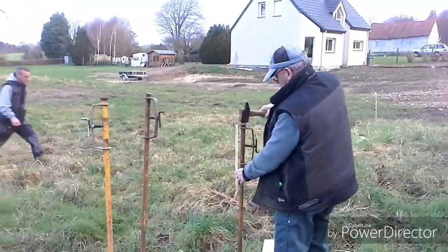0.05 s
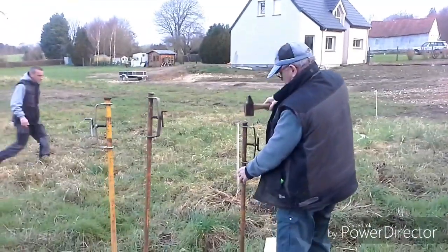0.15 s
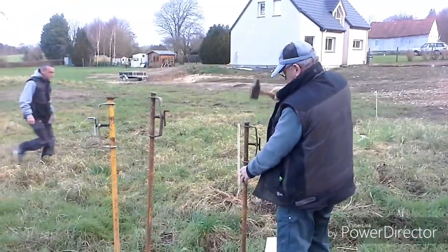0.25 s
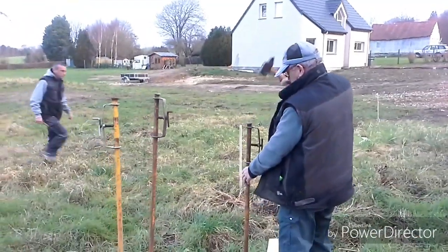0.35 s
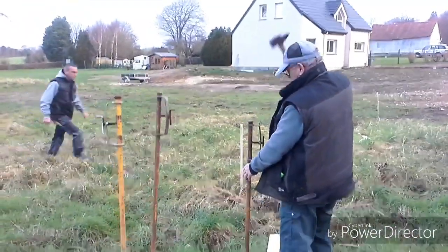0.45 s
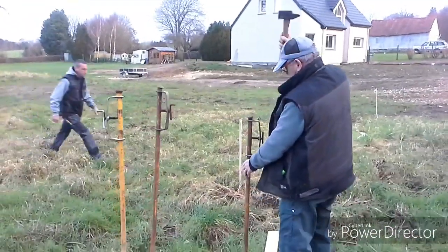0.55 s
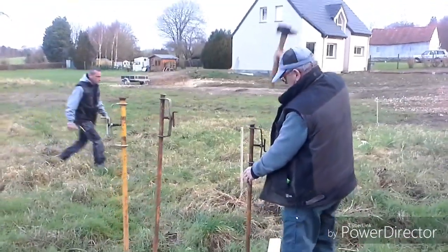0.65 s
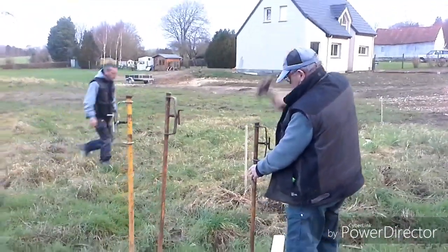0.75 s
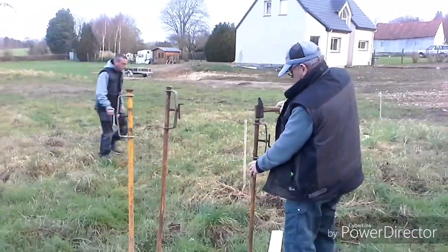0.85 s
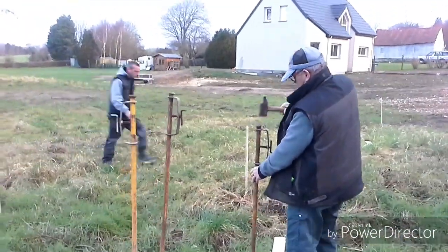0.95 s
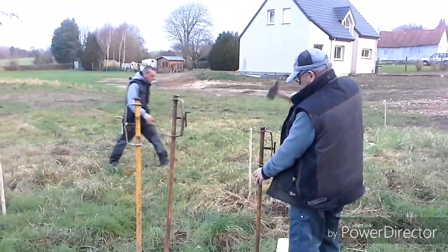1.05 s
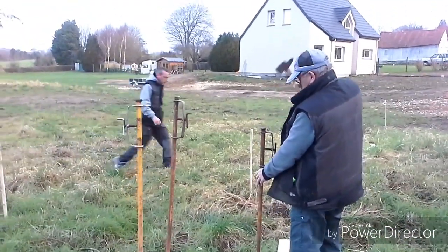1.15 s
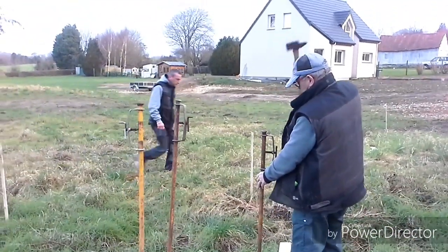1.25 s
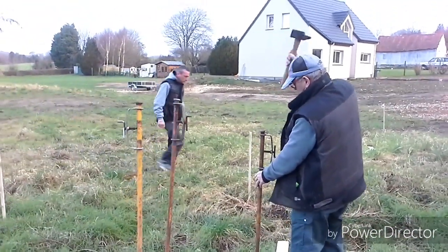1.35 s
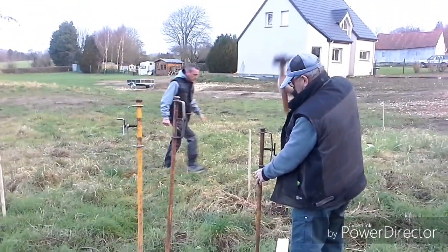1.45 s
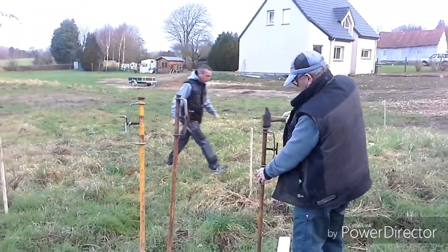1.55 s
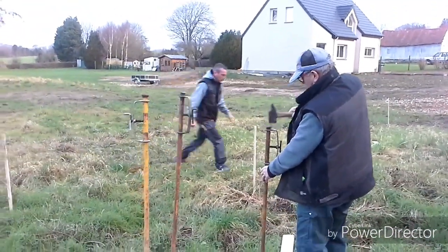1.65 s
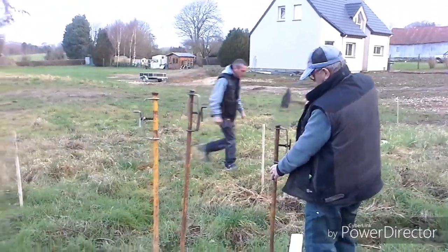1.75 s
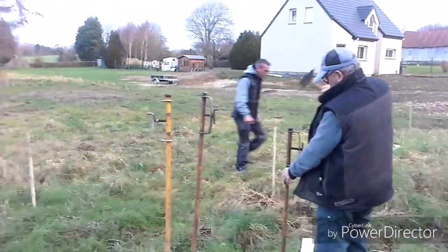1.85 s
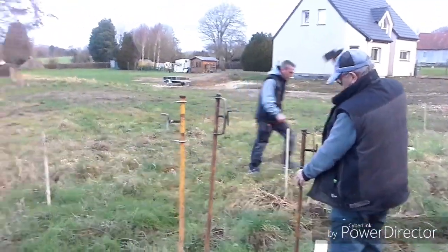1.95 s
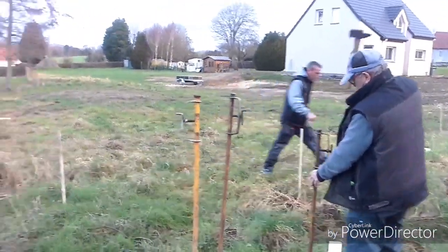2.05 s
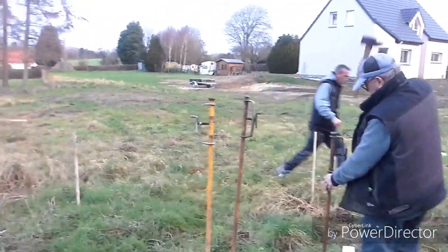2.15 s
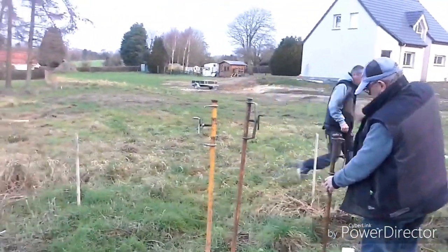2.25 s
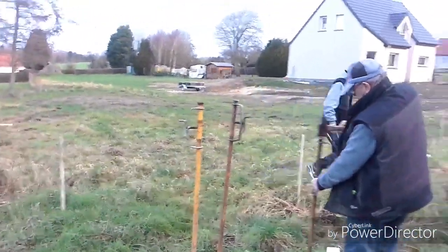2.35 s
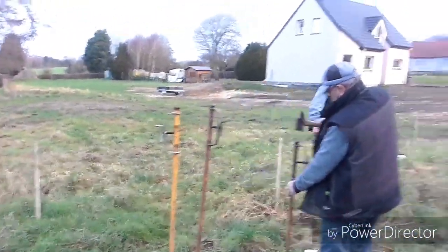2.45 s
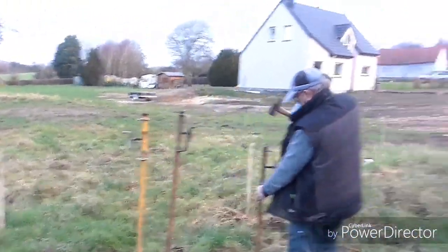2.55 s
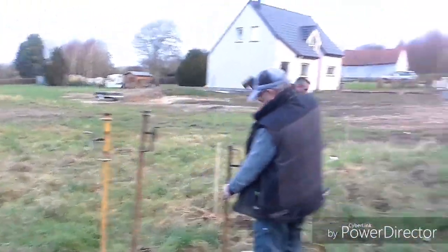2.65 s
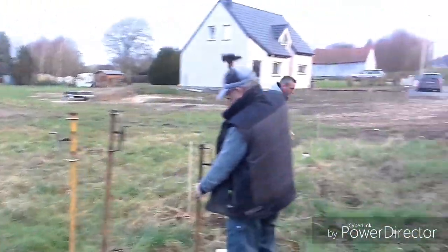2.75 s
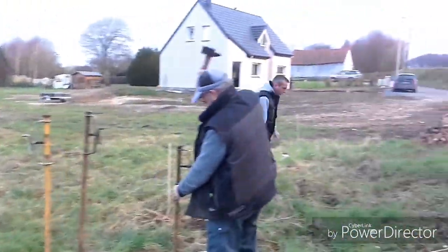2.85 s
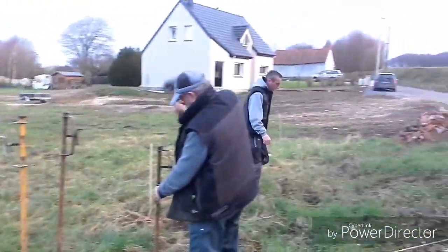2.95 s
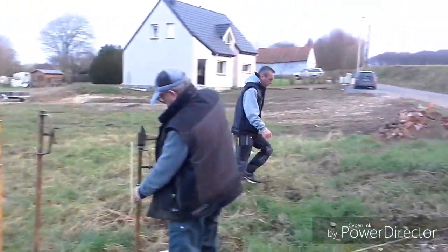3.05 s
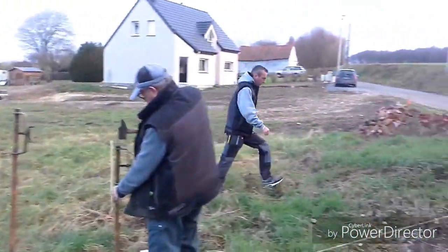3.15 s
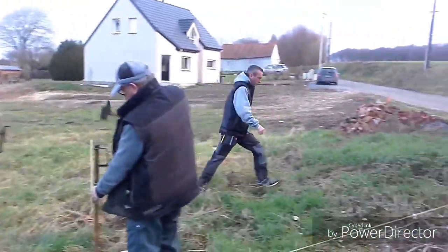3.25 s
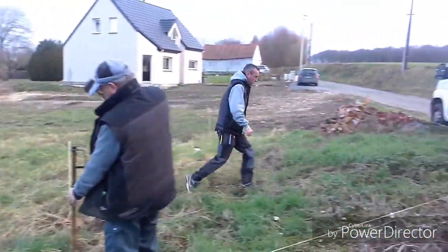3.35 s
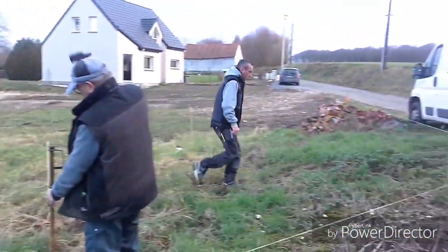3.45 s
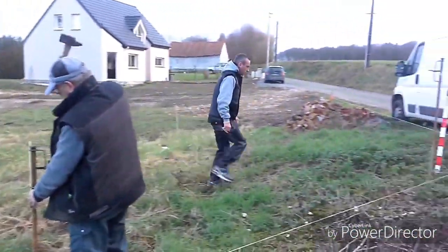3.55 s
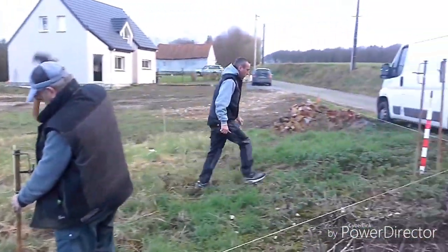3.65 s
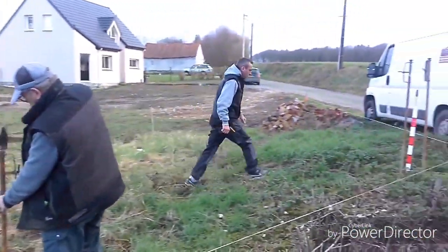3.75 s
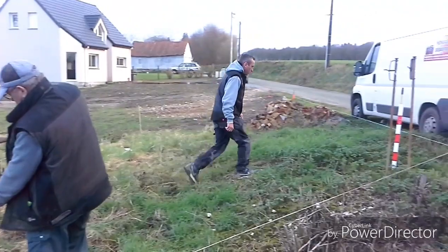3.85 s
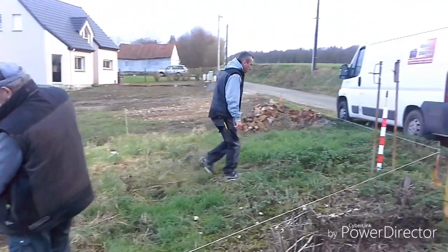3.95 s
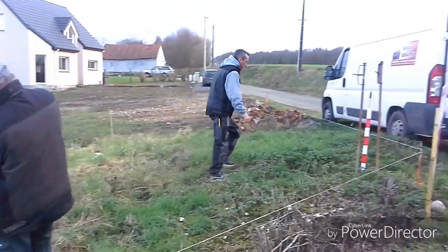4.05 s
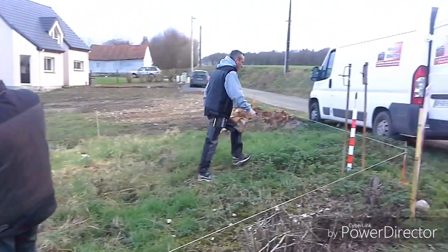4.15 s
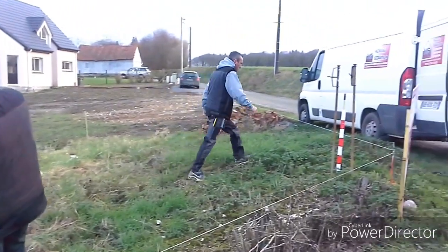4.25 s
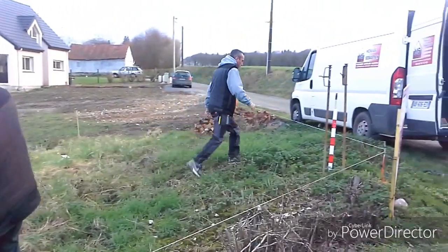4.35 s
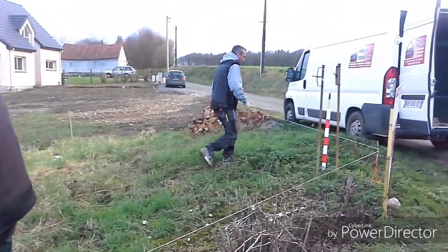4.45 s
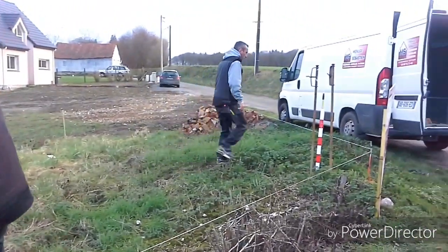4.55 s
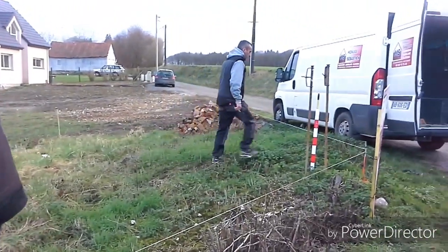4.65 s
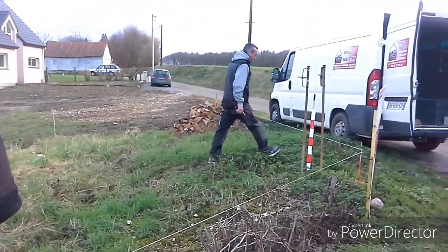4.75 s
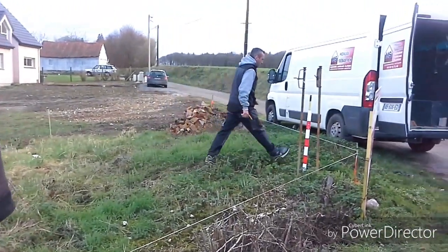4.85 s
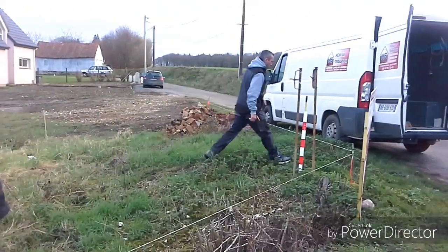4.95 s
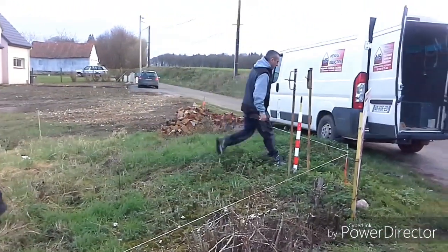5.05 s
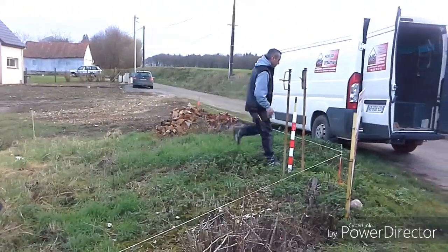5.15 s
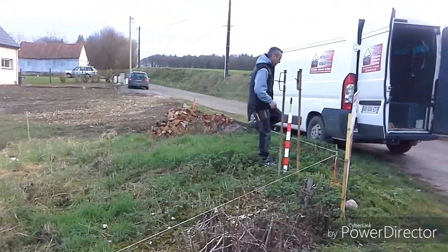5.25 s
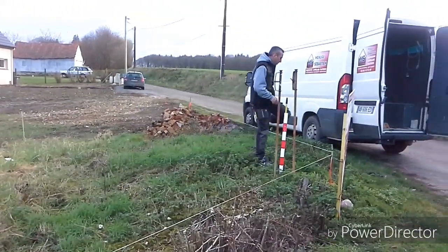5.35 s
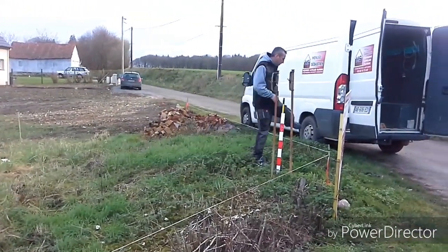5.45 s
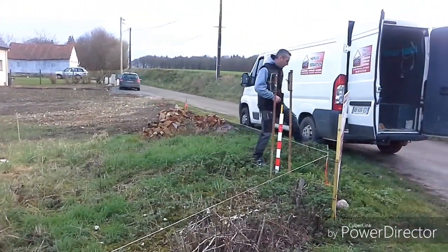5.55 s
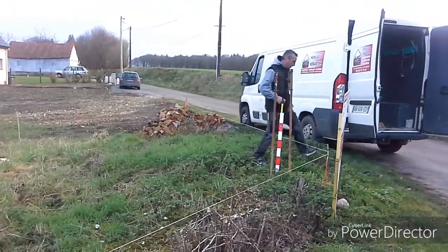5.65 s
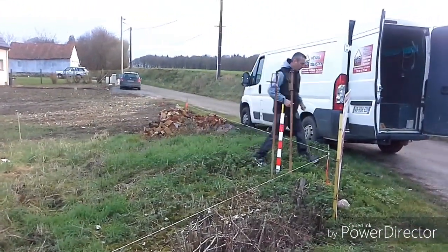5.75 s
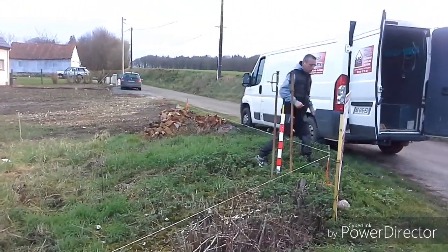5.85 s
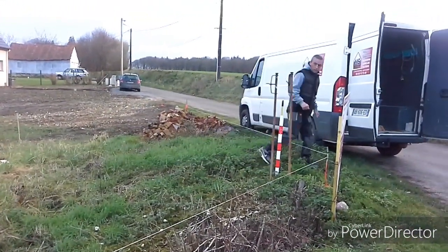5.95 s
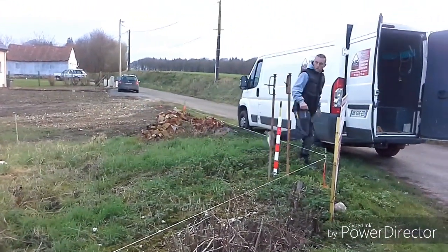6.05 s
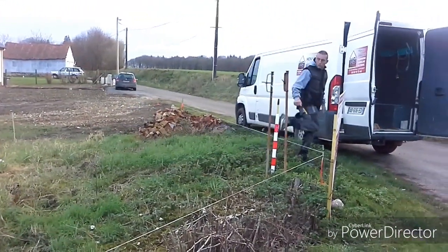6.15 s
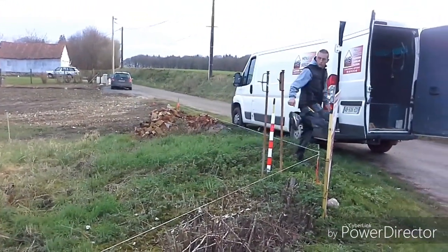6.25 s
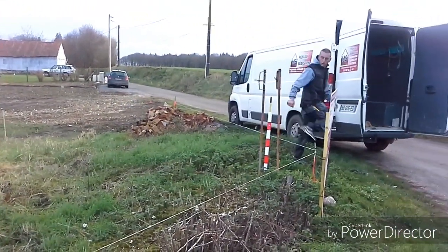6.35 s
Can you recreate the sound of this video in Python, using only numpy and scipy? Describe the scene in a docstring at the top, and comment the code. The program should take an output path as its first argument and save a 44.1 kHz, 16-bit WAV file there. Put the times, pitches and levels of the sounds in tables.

```python
"""Hammering a steel stake in a field

Open countryside, one camera microphone a few metres from the stake, overloading on each of eight blows.
The hand-held steel rings briefly, the hammer rebounds, and houses and a van throw the blow back.
Wind rumbles and pops on the capsule; late on, a far engine whine sinks in pitch over the hush."""
import sys
import numpy as np
from scipy import signal
from scipy.io import wavfile
from scipy.ndimage import uniform_filter1d

SR = 44100
rng = np.random.default_rng(int(sys.argv[2]) if len(sys.argv) > 2 else 0)


def int16_out(signal):
    """Quantize to a 16-bit WAV file."""
    q = np.round(np.clip(np.atleast_2d(signal).T, -1, 1) * 32767)
    wavfile.write(sys.argv[1], SR, q.astype(np.int16))


N = 282681
T = np.arange(N) / SR


def undb(db):
    return 10 ** (np.asarray(db) / 20)


def unit_rms(x):
    return x / np.sqrt(np.mean(x ** 2))


def band(x, lo_hz, hi_hz, order=2):
    return signal.sosfilt(signal.butter(order, [lo_hz, hi_hz], "bandpass", fs=SR, output="sos"), x)


def fade(t, t60):
    return np.exp(-np.log(1000) * t / t60)


def add(out, x, start_s):
    i = int(start_s * SR)
    out[i:i + len(x)] += x[:N - i]


def wander(rate_hz):
    """Random levels held for 1 / rate_hz seconds and smoothed twice; spread near 1."""
    hold = int(SR / rate_hz)
    steps = np.repeat(rng.standard_normal(N // hold + 1), hold)
    return 1.3 * uniform_filter1d(uniform_filter1d(steps, hold), hold)[:N]


# hush at the microphone, with the lingering echo of some blows: (time [s], level [dB], treble lift [dB])
HUSH_LEVELS = [(0.0, -56, 8), (0.4, -48, 4), (0.9, -52, 6), (1.3, -54.5, 8), (2.2, -53.5, 5.5),
               (2.521, -47.5, 3.5), (2.8, -52.5, 3), (3.6, -53, 5.5), (4.36, -47.5, 6), (4.52, -52, 6.5),
               (4.62, -54, 1), (4.75, -52, 6.5), (5.25, -49.5, 4), (5.55, -55.5, 2.5), (5.75, -58, 3.5),
               (6.0, -56, 6), (6.41, -52, 5)]
# its spectrum: (frequency [Hz], relative density [dB])
HUSH_SPECTRUM = [(200, -12), (320, 0), (550, -4), (800, -2), (1150, -7.5), (1500, -16), (2200, -23),
                 (4000, -26.5), (8000, -28), (14500, -27.5)]


def hush():
    """Background hush and hiss in half-octave bands, swelling with the lingering echo after some blows."""
    times, level_db, treble_db = np.transpose(HUSH_LEVELS)
    level_db, treble_db = np.interp(T, times, level_db), np.interp(T, times, treble_db)
    spectrum_hz, density_db = np.transpose(HUSH_SPECTRUM)
    out = 0
    for hz in 240 * 2 ** np.arange(0, 6.1, .5):
        band_db = np.interp(np.log(hz), np.log(spectrum_hz), density_db) + 10 * np.log10(hz / 1000)
        lift_db = treble_db * np.clip(np.log2(hz / 1000), 0, 1)
        flicker_db = wander(20)
        noise = unit_rms(band(rng.standard_normal(N), hz / 2 ** .25, hz * 2 ** .25))
        out = out + undb(band_db + flicker_db + lift_db) * noise
    return out * undb(level_db - 0.5)


# gusts reaching the microphone: (start [s], length [s], rumble level [dB])
WIND_GUSTS = [(0, 0.11, -53), (.51, 0.18, -45), (1.03, .28, -40), (1.41, 0.15, -50), (1.686, 0.033, -49),
              (1.977, 0.37, -55), (2.36, .35, -43), (3.297, 0.73, -54), (4.335, .15, -53),
              (4.678, 0.17, -52), (5.948, 0.15, -50), (6.22, 0.11, -55)]


def gusts(calm_db=-60, rise_s=.015, fall_s=.03):
    """Gain of the wind rumble: each gust rises quickly, holds and dies away."""
    gain = undb(calm_db)
    for start, length, db in WIND_GUSTS:
        rise = 1 / (1 + np.exp(np.clip((start - T) / rise_s, -50, 50)))
        fall = np.exp(-np.maximum(T - start - length, 0) / fall_s)
        gain = gain + undb(db) * rise * fall
    return gain


# loud wind pops, right on the capsule: (time [s], level [dB], pitch [Hz])
LOUD_POPS = [(0.039, -34, 172), (0.202, -27.5, 245), (0.516, -22, 158.7), (0.564, -16, 225),
             (0.608, -20, 228.5), (0.626, -19, 160), (0.645, -20.5, 208), (0.666, -24.5, 252),
             (0.677, -22, 147), (0.733, -34, 200), (0.99, -29, 210), (1.01, -32, 210), (1.044, -25, 148),
             (1.073, -15, 202), (1.112, -17.5, 198.2), (1.123, -17, 164.4), (1.159, -10, 240),
             (1.179, -21, 200.3), (1.209, -16, 208), (1.245, -20, 249), (1.27, -19, 233),
             (1.28, -22.5, 286.3), (1.302, -20, 260), (1.415, -27, 170), (1.436, -23, 191),
             (1.46, -29.5, 217), (1.506, -26.5, 168.3), (1.538, -33, 173.9), (1.623, -31.5, 199),
             (1.962, -30.5, 179), (1.973, -22, 222), (2.039, -31, 147), (2.109, -24.5, 164.5),
             (2.262, -20, 197), (2.398, -22.5, 221), (2.425, -31, 185), (2.468, -16.5, 405),
             (2.478, -21.5, 350), (2.508, -20, 189.7), (2.543, -25, 157), (2.579, -25, 180),
             (2.611, -13, 320), (2.628, -17, 157), (2.655, -33, 215), (2.671, -27.5, 185),
             (2.693, -32, 218), (2.707, -33, 182), (2.816, -34, 166.5), (3.32, -29, 154.4),
             (3.51, -27, 237), (3.564, -22.5, 202), (3.625, -30, 184), (3.759, -30, 154), (3.939, -30, 239),
             (4.347, -29, 157), (4.426, -29.5, 143), (4.529, -29, 197), (4.619, -32, 171),
             (4.756, -29, 185), (4.903, -34, 198.6), (5.187, -34.5, 364), (5.986, -28, 263.7),
             (6.051, -19.5, 295), (6.186, -32.5, 213.4)]


def wind_pops(gust, small_count=170, over_rumble_db=11, small_centre_hz=185):
    """Eddies knock the membrane for a cycle or two; small knocks fall at random among the loud ones."""
    place, size, pitch = rng.random((small_count, 3)).T
    crowding = np.cumsum(gust ** .4)  # eddies crowd into the gusts
    small_s = np.clip(np.interp(place, crowding / crowding[-1], T), .03, T[-1])
    small_db = 20 * np.log10(np.interp(small_s, T, gust)) + over_rumble_db + 12 * (size - .5)
    small_hz = small_centre_hz * 2 ** (.8 * (pitch - .5))
    out = np.zeros(N)
    t = np.arange(-int(.02 * SR), int(.02 * SR)) / SR
    for time, db, hz in [*LOUD_POPS, *zip(small_s, small_db, small_hz)]:
        polarity, phase = rng.standard_normal(2)
        cycles = hz * t + 0.22
        width = np.where(cycles < 0, .3, .9)  # a quick push, then the membrane swings back and settles
        knock = np.exp(-np.abs(cycles / width) ** 1.9) * np.cos(2 * np.pi * cycles + .5 * phase)
        add(out, np.sign(polarity) * undb(db) * knock, time + t[0])
    return out + 1.8 * out ** 2  # a hard push bends the membrane unevenly and sharpens the knock


def wind():
    """Wind on the microphone: pops over a throbbing rumble that follows the gusts."""
    gust = gusts()
    pops = wind_pops(gust)
    rumble = unit_rms(band(rng.standard_normal(N), 64, 300))
    rumble += undb(-10) * unit_rms(band(rng.standard_normal(N), 30, 120))
    throb = undb(2.5 * wander(50))
    return band(pops + rumble * gust * throb, 56, 2000, order=3)  # the capsule sheds the deep bass


# modes of stake and hammer head:
# (frequency [Hz], level [dB], t60 [s], share that rings on in the grip of hand and soil [dB])
STEEL_MODES = [(1144, -4.5, 0.095, -29.5), (1591.5, 1, 0.093, -26), (1886, -1, 0.049, -27.5),
               (2018, -2.5, 0.087, -26), (2342, -4, 0.17, -27), (2522.5, -3.5, 0.24, -27.5),
               (2730, -10, 0.033, -30.5), (2877, -6, 0.099, -24.5), (3248, -4.5, 0.32, -28),
               (3466, -4.5, 0.16, -30), (3726, -5, 0.14, -27), (4019, -4.5, 0.077, -27.5),
               (4076, -11, 0.17, -29.5), (4312, -8, 0.14, -28.5), (4620, -6.5, .1, -32),
               (4830, -1, .7, -39), (5310, -6, .12, -26), (5920, -5, .12, -28), (6450, -9, .18, -22),
               (9830, -13, 0.039, -27), (10280, -11, .15, -18), (10500, -9, .2, -15), (10745, -6, .14, -21),
               (11620, -12, 0.044, -21.5), (11980, -9.5, 0.11, -23), (11800, -19, 0.033, -21.5),
               (13280, -7.5, 0.067, -24), (12680, -11, 0.058, -22.5), (14850, -10.5, 0.14, -22.5)]


def blow(low_db, mid_db, upper_db, treble_db, ping_db, bend_ratio, free_ring_s, thud_db):
    """Steel on steel rings and cracks until hand and soil choke it; brackets rattle, the soil thuds."""
    t = np.arange(int(.4 * SR)) / SR
    choke = np.exp(-(t / free_ring_s) ** 2.4)
    ring = 0
    for hz, db, t60, gripped_db in STEEL_MODES:
        scatter, detune, phase = rng.standard_normal(3)
        # each blow favours other modes
        db += 1.5 * scatter + low_db * (hz < 1300)
        db += mid_db * (2150 < hz < 2800) + upper_db * (2800 < hz < 6200)
        db += ping_db if 10000 < hz < 11000 else treble_db * (hz > 6200)
        # the lower modes ring slightly higher or lower on each blow
        hz *= (bend_ratio if hz < 2800 else 1) * (1 + .003 * detune)
        # loose brackets chatter against the shaft and blur every mode
        blur_hz = min(.013 * hz, 45)
        chatter = np.cumsum(rng.standard_normal(len(t))) * np.sqrt(2 * np.pi * blur_hz / SR)
        envelope = undb(db) * fade(t, t60) * (choke + undb(gripped_db))
        ring = ring + envelope * np.sin(2 * np.pi * hz * t + 1.5 * phase + chatter)
    noise = rng.standard_normal((4, len(t)))
    crack = undb(1.5) * band(noise[0], 1500, 6000)
    crack += undb(4 + treble_db) * band(noise[1], 11000, 14500, order=1)
    rattle = undb(-15) * band(noise[2], 910, 10000, order=1) * fade(t, 0.22)
    thud = undb(thud_db) * unit_rms(band(noise[3], 60, 420, order=1)) * fade(t, 0.043)
    attack = np.minimum(t / .0006, 1)
    return undb(-4) * (ring + crack * choke + rattle) * attack + thud


# houses and a van, as their echoes reach the microphone: (delay [s], level [dB], smear [s])
WALL_ECHOES = [(.06, -38, 0.017), (0.163, -34, 0.025), (.22, -39.5, 0.036), (.270, -37, 0.007),
               (0.289, -39, 0.006), (0.431, -47, 0.025)]


def echoes(hit, crack_s=.002):
    """Rough walls smear and dull each echo; trees and far roofs give a scattered tail."""
    t = np.arange(int(.8 * SR)) / SR
    tail = undb(-56) * rng.standard_normal(len(t)) * fade(t, 1.09) * np.minimum(t / 0.022, 1)
    walls = 0
    for delay, db, smear in WALL_ECHOES:
        shape = np.where(t > delay, np.exp(-np.maximum(t - delay, 0) / smear), 0)
        walls = walls + undb(db) * rng.standard_normal(len(t)) * shape / np.sqrt(np.sum(shape ** 2))
    # only the first crack feeds the scattered tail, so it sounds diffuse and unpitched
    crack = hit * np.exp(-(t[:len(hit)] / crack_s) ** 2)
    from_walls = signal.fftconvolve(hit, band(walls, 1600, 2500, order=1))
    scattered = signal.fftconvolve(crack, band(tail, 930, 4400, order=1))
    return from_walls + scattered


# hammer blows: (time [s], force [dB], lowest mode [dB], middle modes [dB], upper modes [dB],
# treble [dB], head ping [dB], bending pitch [ratio], free ring [s], thud [dB], rebound delay [s])
HAMMER_BLOWS = [(0.173, 2.5, 0, 1, 0.5, -1, 2, 1.03, 0.01, -15, 0.015),
                (0.9415, 2, 2.5, -2, 0.5, 0, 1, 0.97, 0.0097, -15.5, 0.024),
                (1.6896, 0.5, -4, 1, .5, 1.5, 0, 0.99, .012, -21.5, .026),
                (2.4392, 3.5, 3, -2, -4.5, 0, -5.5, 1.03, 0.01, -17, 0.024),
                (3.177, -3, 4, -2, .5, -3, 1, 1.033, 0.01, -9, 0.029),
                (3.917, -1, -3.5, -2.5, 2, 2, -1, 1.02, .0095, -21.5, 0.023),
                (4.6795, -2.5, -1, -0.5, 1, 0, -2.5, 1.016, .010, -16.5, 0.043),
                (6.2266, -5.5, -41, 7, 2, 0.5, 4, 1.01, 0.0093, -14, 0.057)]


def hammering(rebound_db=-7, rebound_db_per_s=-500):
    """Each blow from a few metres off, direct and echoed; the head rebounds and taps once more."""
    out = np.zeros(N)
    for time, force_db, *timbre, free_ring_s, thud_db, rebound_s in HAMMER_BLOWS:
        hit = undb(force_db) * blow(*timbre, free_ring_s, thud_db)
        add(out, hit, time)
        tap = band(blow(*timbre, free_ring_s=0.0062, thud_db=-60.5), 1100, 2700, order=1)
        tap_db = rebound_db + rebound_db_per_s * rebound_s  # the later the tap, the softer
        add(out, undb(tap_db) * tap, time + rebound_s)
        add(out, echoes(hit), time)
    return out


# the far engine, as heard from the field: (time [s], level [dB])
ENGINE_LEVELS = [(4.93, -72), (4.97, -55.5), (5.12, -54), (5.21, -64), (5.3, -48.5), (5.4, -61), (5.6, -68),
                 (6.0, -67.5), (6.12, -62.5), (6.22, -70)]


def engine_whine(start_s=4.95, start_hz=1656, sag_hz_per_s=190):
    """A far engine tone that sinks as it passes; moving air makes it waver."""
    hz = start_hz - sag_hz_per_s * (T - start_s)
    waver = 1 + 0.02 * wander(120) + .008 * wander(15)
    phase = 2 * np.pi * np.cumsum(hz * waver) / SR
    level_db = np.interp(T, *np.transpose(ENGINE_LEVELS), left=-120, right=-120)
    return np.sqrt(2) * undb(level_db + 3.5 * wander(45)) * np.sin(phase)


def scene():
    """The field at one microphone, the same in both channels."""
    sound = hush() + wind() + hammering() + engine_whine()
    return np.array([sound, sound])


def record(dry, shelf_hz=14550, cutoff_hz=15547):
    """The microphone input clips flat on the blows; the top is shelved down, then cut."""
    clipped = np.clip(dry, -.9, .9)
    below_shelf = signal.sosfiltfilt(signal.ellip(8, .1, 45, shelf_hz, fs=SR, output="sos"), clipped)
    shelved = np.clip(below_shelf + undb(-24) * (clipped - below_shelf), -.97, .97)
    return signal.sosfiltfilt(signal.ellip(8, .1, 40, cutoff_hz, fs=SR, output="sos"), shelved)


dry = scene()
out = record(dry)
int16_out(out)
```